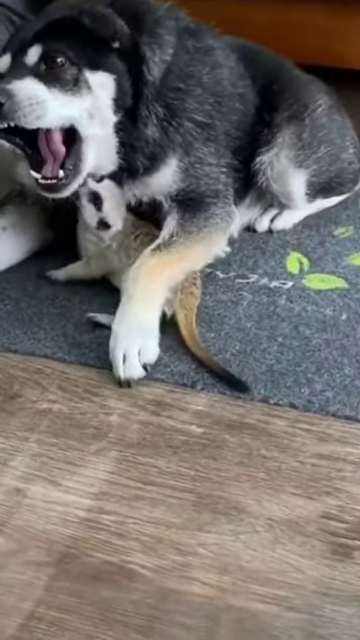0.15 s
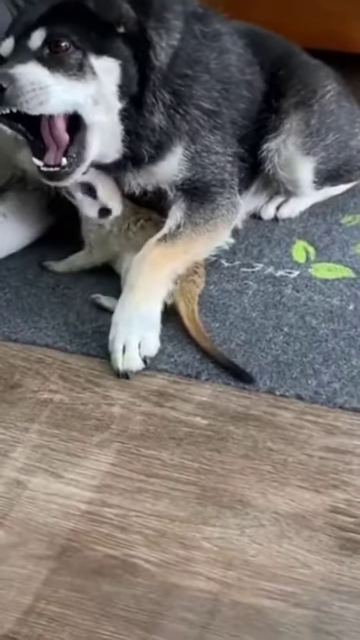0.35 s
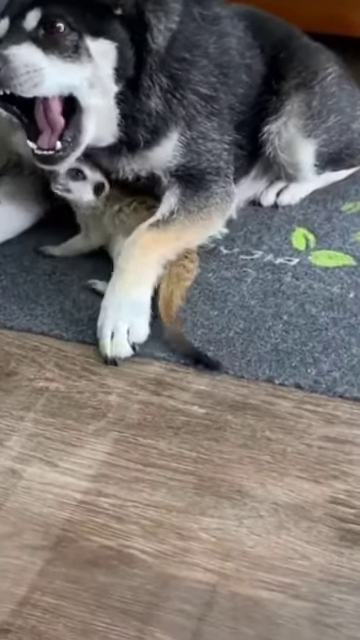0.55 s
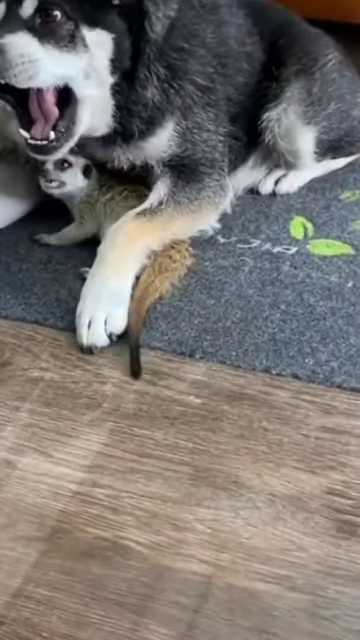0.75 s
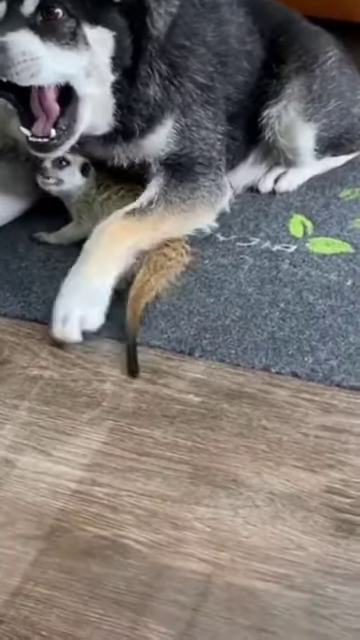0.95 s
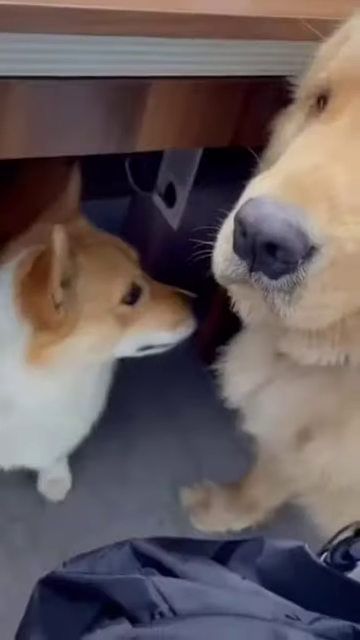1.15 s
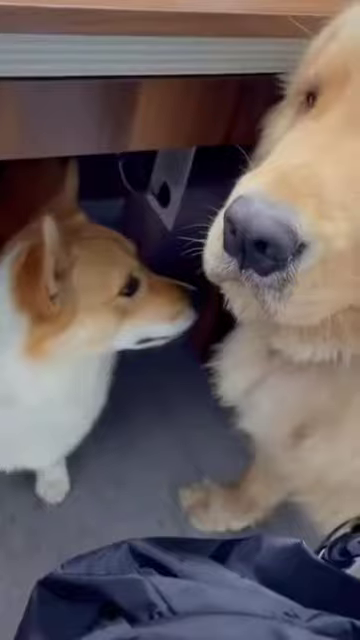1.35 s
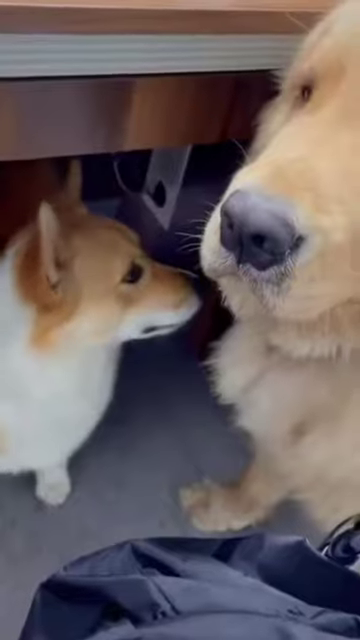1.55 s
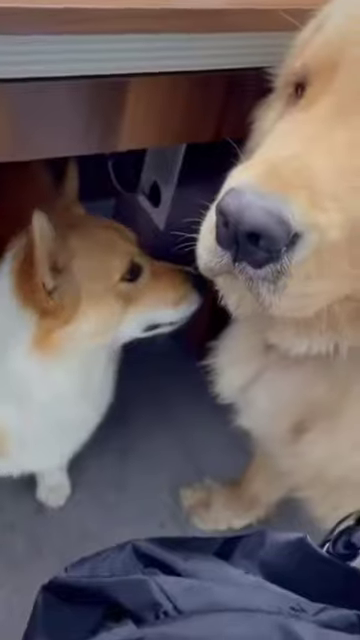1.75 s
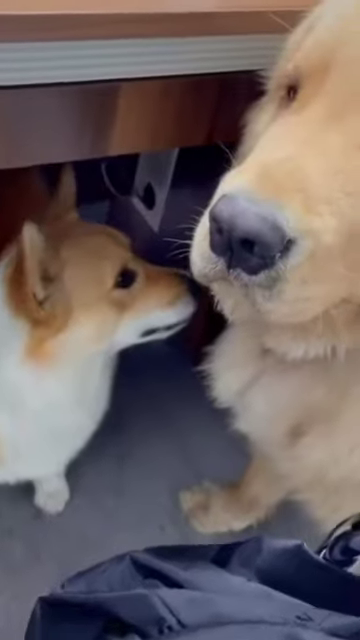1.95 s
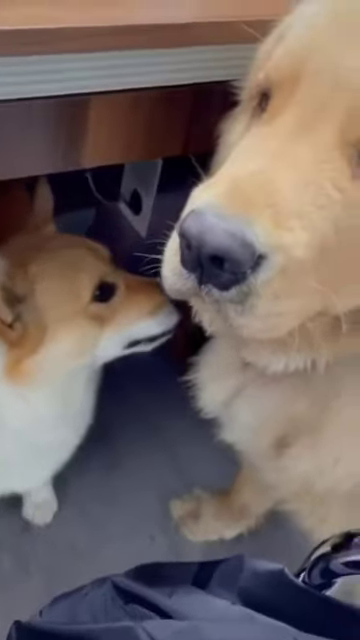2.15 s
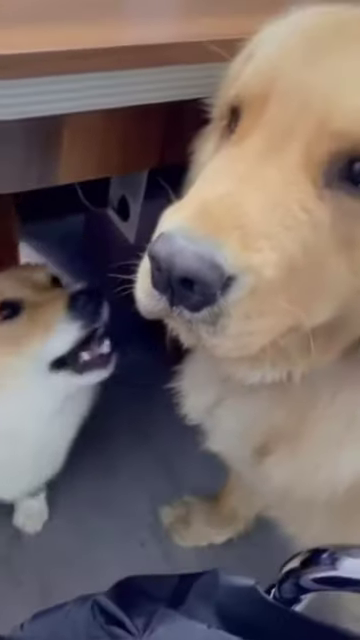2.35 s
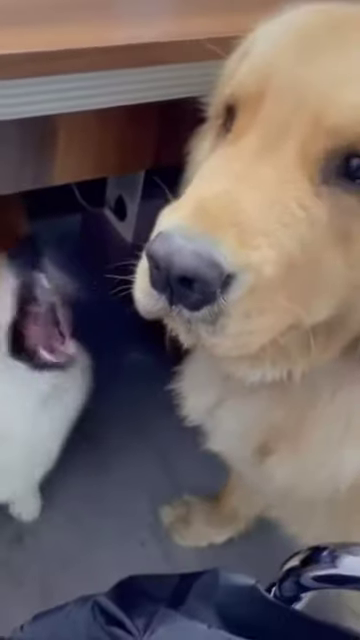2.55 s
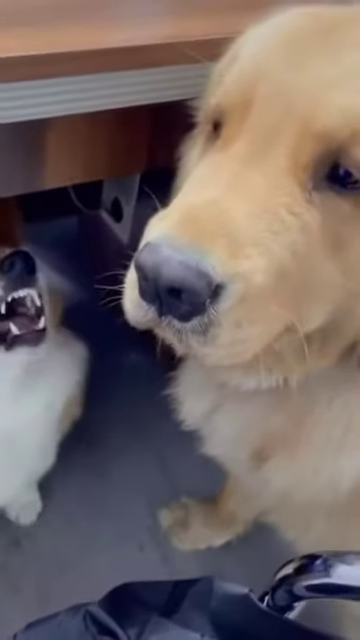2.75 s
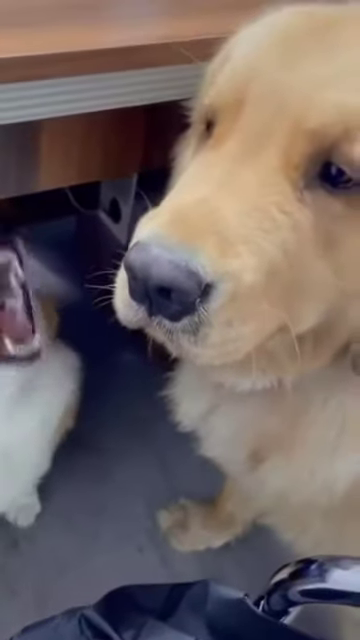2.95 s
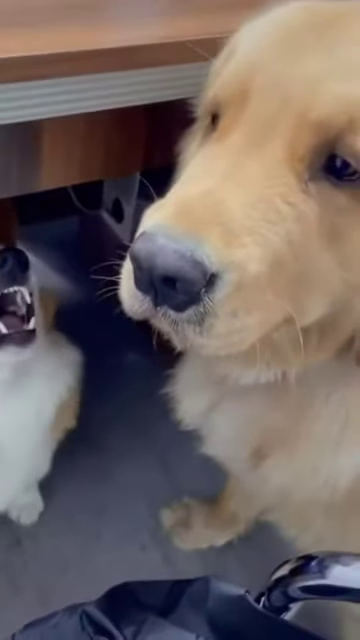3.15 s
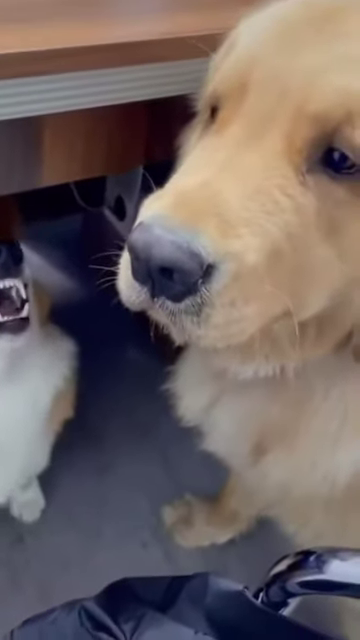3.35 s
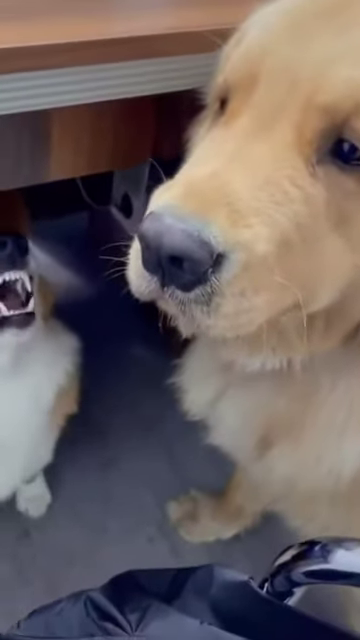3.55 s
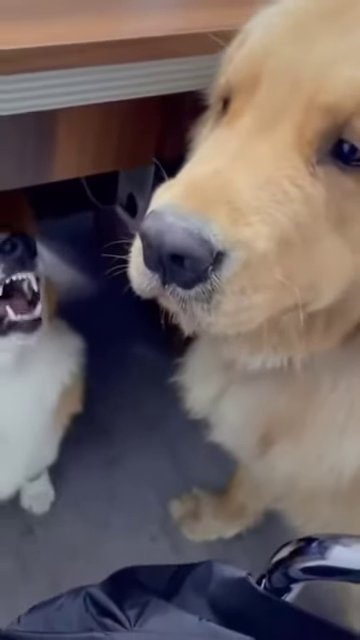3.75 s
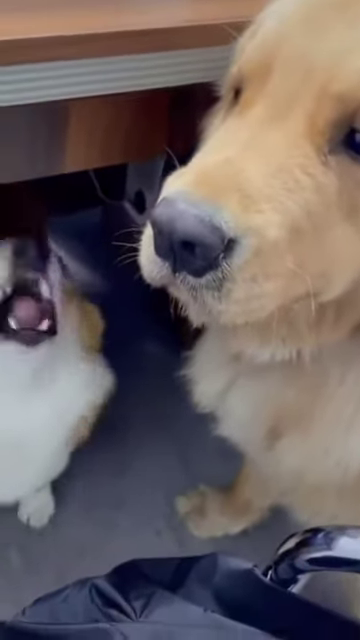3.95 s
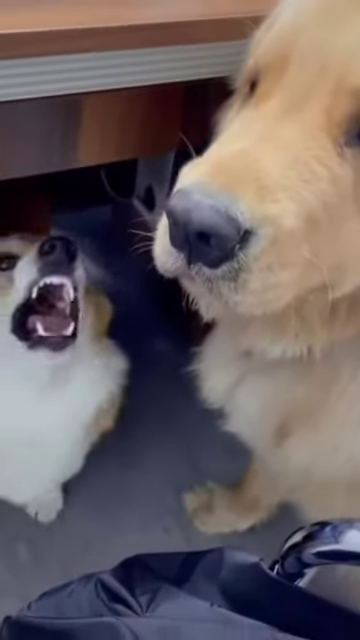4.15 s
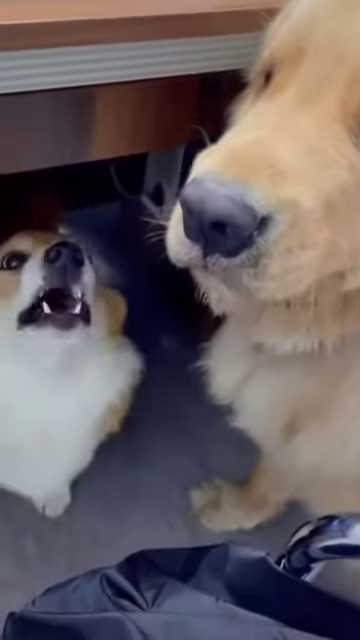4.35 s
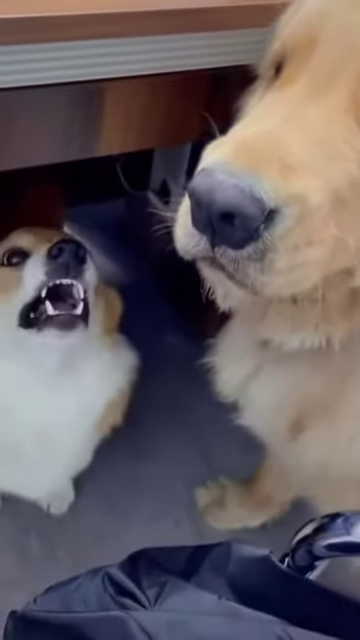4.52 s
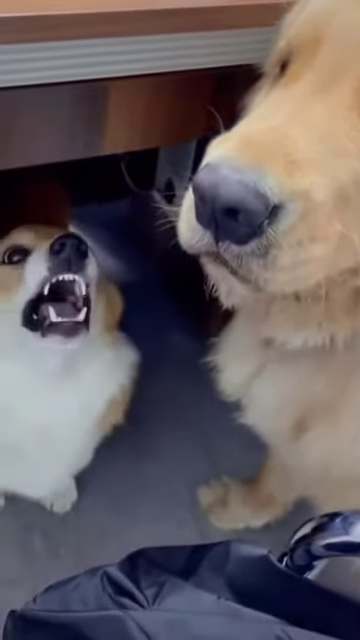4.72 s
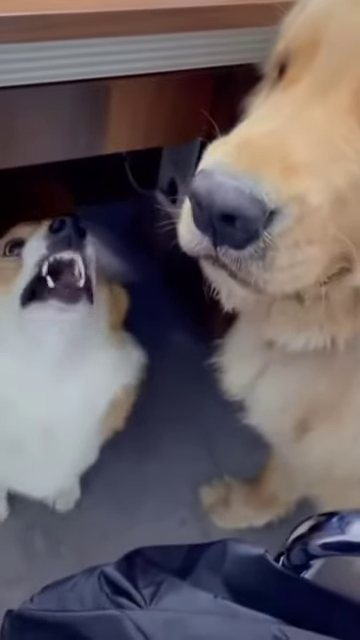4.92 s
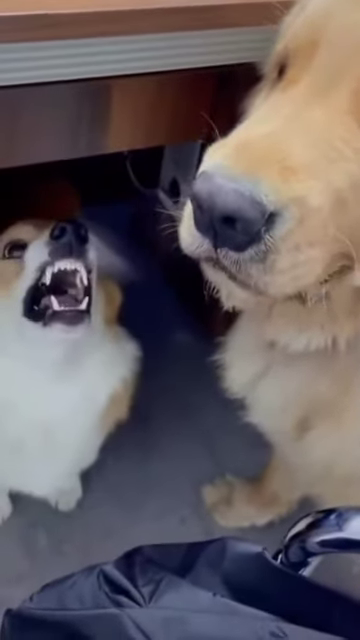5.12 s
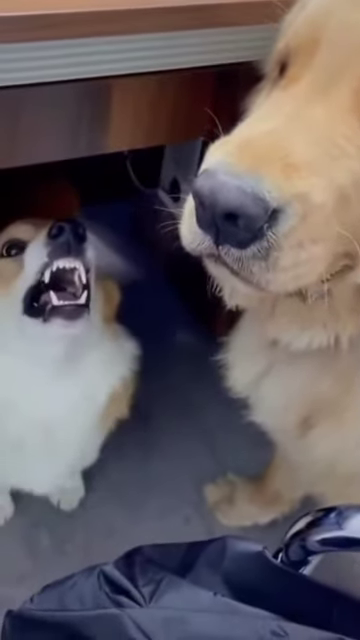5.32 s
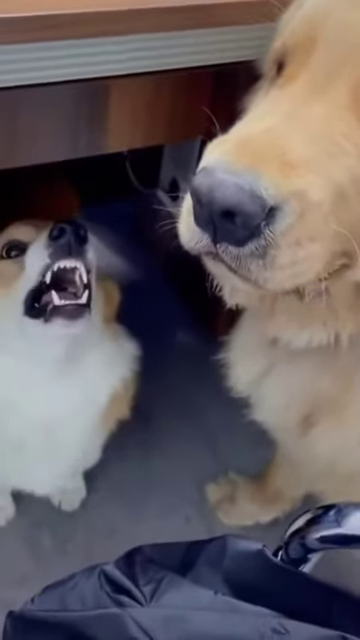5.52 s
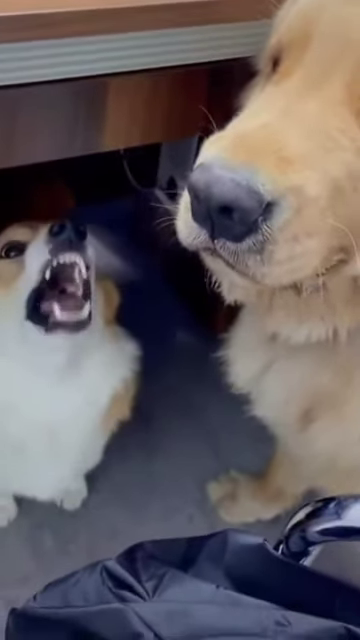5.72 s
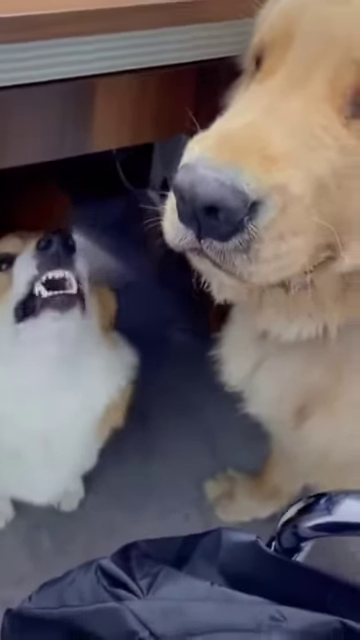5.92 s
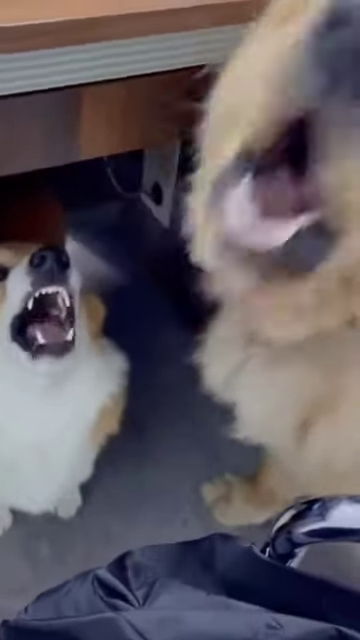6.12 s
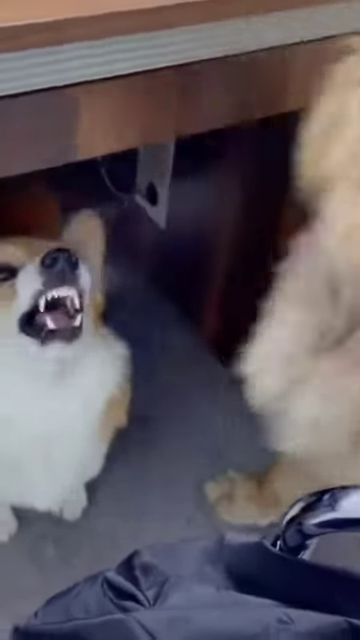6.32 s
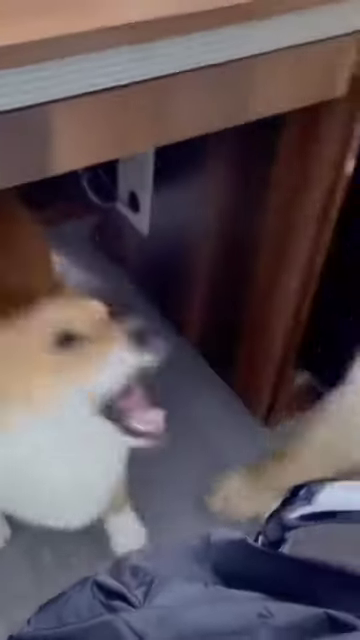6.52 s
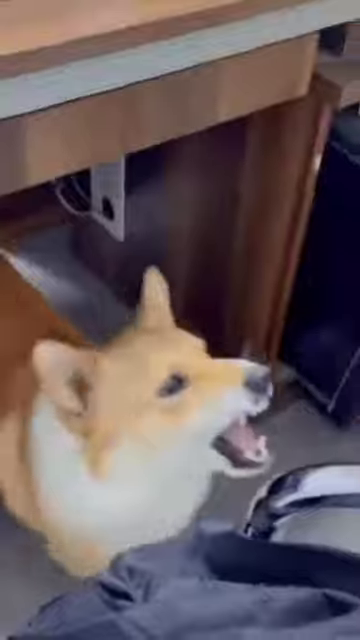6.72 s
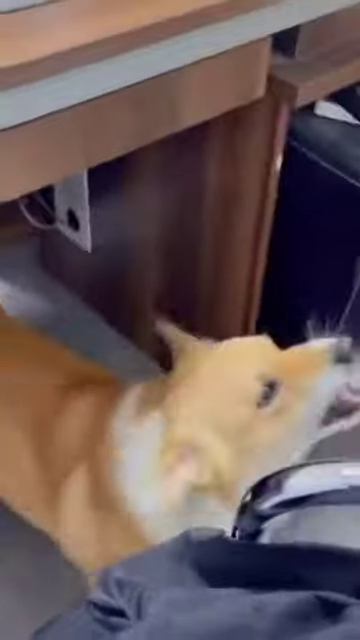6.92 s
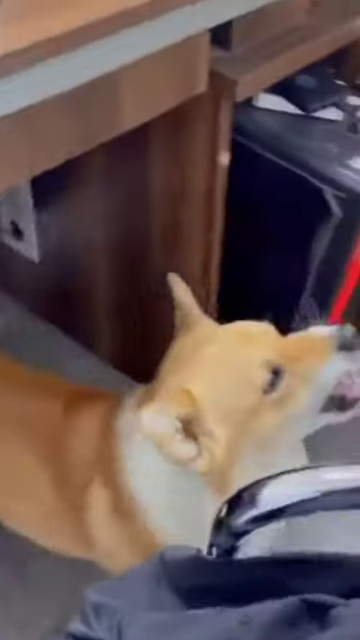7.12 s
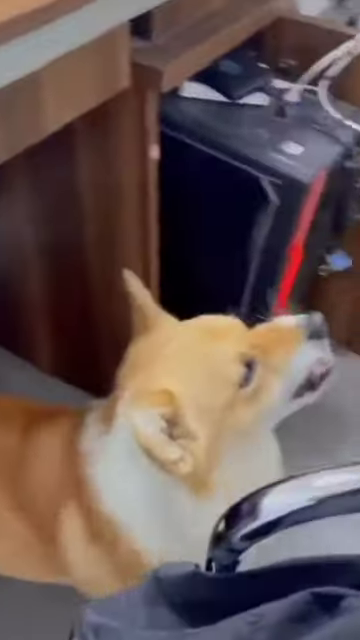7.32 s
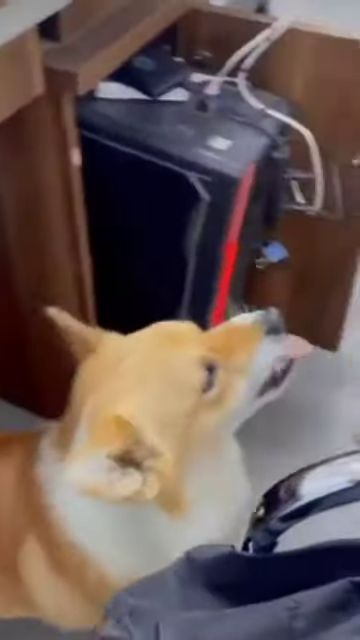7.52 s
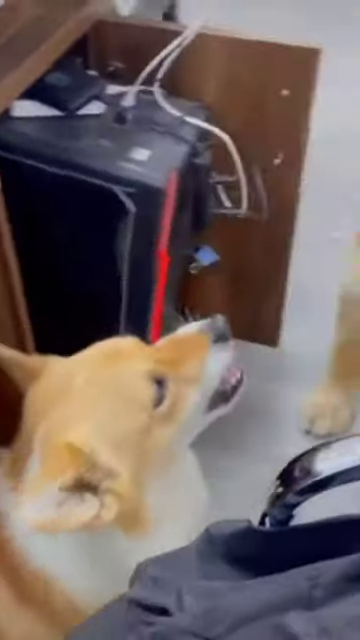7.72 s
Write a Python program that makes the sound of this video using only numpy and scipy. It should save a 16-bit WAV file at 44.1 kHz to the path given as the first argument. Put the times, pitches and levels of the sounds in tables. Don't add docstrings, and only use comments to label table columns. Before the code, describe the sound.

From 0 to 1 s, close and wide in stereo, an animal's airy hiss and pant swells several times, strongest near 0.6 and 0.9 s, with small grunts, squeaks and low bumps. A faint tick marks the cut at about 1.1 s. From 1.25 s, in mono, a small dog growls softly and low until 2.2 s. Sharp, arching barks snap out at 2.3, 2.6 and 3.0 s, with a bump of handling near 2.9. A quiet sinking growl follows, then barks at 3.9, 4.3 and 4.9 s, with a tightening growl and snarl between. After a pause with a fluttering gasp, a long hoarse bark at 5.8 s. From 6.1 s another dog's whistling, wavering yelps rise over duller barks at 6.6 and 6.9 s, dying into a whimper and faint mutter by 7.7 s. Short room echo, soft air and hand rumble.

```python
import sys
import numpy as np
from scipy import signal
from scipy.fft import rfft, irfft, next_fast_len
from scipy.io import wavfile
from scipy.ndimage import uniform_filter1d, minimum_filter1d, map_coordinates

SR = 44100
rng = np.random.default_rng(int(sys.argv[2]) if len(sys.argv) > 2 else 0)


def nominal_scale(level):
    x = np.asarray(level, float) / 20
    return 10 ** x


def generate_wav(signal):
    frames = np.transpose(np.atleast_2d(signal))
    scaled = np.clip(frames, -1, 1) * 32767
    pcm = np.round(scaled).astype(np.int16)
    wavfile.write(sys.argv[1], SR, pcm)


N = 342657
SECOND_S = 1.25
LOCK_HZ = 538


def unit(x):
    return x / np.sqrt(np.mean(x ** 2) + 1e-20)


def even(x, over_s):
    power = uniform_filter1d(x ** 2, round(over_s * SR), mode="reflect")
    return x / np.sqrt(np.abs(power) + 1e-12)


def along(points, hz):
    f, v = np.transpose(points)
    return np.interp(np.log(hz + 1), np.log(f + 1), v, -120, -120)


def span(rows):
    return round((rows[-1][0] - rows[0][0]) * SR)


def curves(rows, length):
    s, *cols = np.transpose(rows)
    return [np.interp(s[0] + np.arange(length) / SR, s, c) for c in cols]


def wobble(rate, length):
    knots = rng.standard_normal(int(length * rate / SR) + 4)
    return map_coordinates(knots, [np.arange(length) * rate / SR])


def bumps(rows, n):
    t = np.arange(n) / SR
    return sum(nominal_scale(db - 10 * np.where(t < s, (s - t) / rise, (t - s) / fall)) for s, db, rise, fall in rows)


def filtered(x, response):
    m = next_fast_len(x.shape[-1] + 4096)
    return irfft(rfft(x, m) * response(np.fft.rfftfreq(m, 1 / SR)), m)[..., :x.shape[-1]]


def noise(spectrum, shape):
    return unit(filtered(rng.standard_normal(shape), lambda hz: nominal_scale(along(spectrum, hz))))


def tract(modes):
    def response(f):
        return sum((-1) ** k * nominal_scale(db) * 1j * f * w / (c * c - f * f + 1j * f * w)
                   for k, (c, w, db) in enumerate(modes))
    return response


def add(track, s, x):
    at, ends = round(s * SR), np.arange(len(x))
    x = x * np.clip(np.minimum(ends, ends[::-1]) / 130, 0, 1)
    track[at:at + len(x)] += x[:N - at]


def folds(pitch, rough, jitter, tilt, flutter_db, first, count, second_db=0):
    rough, n = np.clip(rough, 0, 1), len(pitch)
    pitch = uniform_filter1d(pitch, round(.02 * SR), mode="nearest")
    shaky = pitch * (1 + jitter * rough * wobble(pitch.mean() / 2, n))
    phase = 2 * np.pi * np.cumsum(shaky) / SR
    pulses = np.zeros(n)
    for k in range(round(first), count + 1):
        level = second_db * (k == 2) + flutter_db * wobble(pitch.mean() / 9, n)
        pulses += k ** -tilt * nominal_scale(level) * np.cos(k * phase + .35 * k * k)
    pulses = unit(pulses)
    pulses *= 1 + np.clip(3.8 * rough * wobble(30, n), -1, 1) * np.cos(phase / 2)
    air = unit((1 + np.cos(phase)) ** 2 * rng.standard_normal(n))
    return np.sqrt(1 - rough) * pulses + 2.4 * rough * air, phase


# (f/Hz, width/Hz, level/dB)
GAPE = [(616, 1100, -8.5), (1157, 560, 0.5), (1718, 820, -0.5), (2740, 210, -5.5), (3126, 230, -8)]
THROAT = [(640, 240, -3.5), (867.6, 210, -0.5), (1394, 200, -6), (1620, 170, -1), (2135, 140, -13),
          (2583, 120, -10.5)]
# (f/Hz, level/dB per Hz)
TEETH = [(1900, -41.5), (3300, -8), (4000, -13), (4400, -24), (5300, -15.5), (6400, -6), (7200, -15.5),
         (7900, -40.5), (8900, -18), (10400, -30), (12200, -23), (13400, -48.5), (15000, -50.5),
         (15350, -29), (15700, -60.5)]


def bark(start, pitch, db, top_db, rough, first_db, second_db, clear_hz, thin_db):
    def edges(f):
        return (1j * f / 500) ** 2 / (1 + 1j * f / 500) ** 2 / (1 + (f / clear_hz) ** 10)

    gape = np.clip(1 - 4 * (1 - pitch / pitch.max()), 0, 1)
    source, phase = folds(pitch, rough + .18 * (1 - gape), jitter=.05, tilt=0.22, flutter_db=3.0,
                          first=2, count=12, second_db=second_db * gape)
    voice = gape * filtered(source, tract(GAPE)) + 2.0 * (1 - gape) * filtered(source, tract(THROAT))
    ridges = unit(filtered(source, lambda f: nominal_scale(along(TEETH, f)) * (f < 7400) * (f > 4200)))
    air = filtered(noise(TEETH, len(db)), lambda f: nominal_scale(thin_db * (f > 8000)))
    air = (0.35 + 0.9 * rough) * air * (1 + 0.77 * np.cos(phase))
    teeth = nominal_scale(2.5 * wobble(60, len(db))) * (air + 0.8 * ridges)
    if start > 6.4:
        voice = filtered(voice, lambda f: 1 / (1 + (f / 2500) ** 4))
    overtones = nominal_scale(db - 2.0) * (even(filtered(voice, edges), over_s=0.025) + nominal_scale(top_db + 4.0) * teeth)
    return overtones + nominal_scale(first_db) * np.sqrt(2) * np.sin(phase)


# (t/s, length/s, top pitch f/Hz, level/dB, fundamental level/dB)
CLEAR = [(2.575, .155, 636, -8.5, -21.5)]
BRIGHT = [(4.863, 0.156, 636, -7.5, -26)]
HOARSE = [(2.99, 0.158, 612, -8.5, -26.5)]
SHARP = [(3.93, .145, 640, -8.5, -23.5)]
ROUGH = [(2.262, .158, 630.2, -15, -16.5)]
SLOW = [(4.268, .19, 632, -8.5, -24.5)]
LATE = [(5.765, .2, 638, -9, -22.5)]
TURNED = [(6.55, .19, 614.5, -16.5, -27)]
LAST = [(6.858, .165, 565, -15.5, -29)]
# (barks, roughness [0-1], pitch drop at the ends [0-1], place of the top [0-1],
# attack share [0-1], sag level/dB, start level/dB, flatness of the top [exponent],
# second partial level/dB, highest clear f/Hz, thin hiss level/dB)
KINDS = [
    (CLEAR, 0.07, 0.62, .5, 0.2041, -7, -28, 2.4, 0.1, 3450, -3),
    (BRIGHT, .12, .6, .55, .26, -7, -30, 2.2, -1.5, 3350, 8),
    (HOARSE, .17, .54, .49, .24, -7, -34, 2.1, -4, 3350, 5),
    (SHARP, .25, .54, .54, .2, -5, -20, 2.2, -1.5, 3450, 1.5),
    (ROUGH, .45, .55, .52, .2, -1.2, -30, 2.2, -3, 3050, -1.5),
    (SLOW, .33, .62, .54, 0.28, -7, -38, 2.1, -1.5, 3150, .1),
    (LATE, .31, .62, .6, .36, -6, -37, 2.3, -.5, 2900, -.5),
    (TURNED, .36, .35, .4, 0.1176, -4, -22, 2.1, -.1, 3300, 1.5),
    (LAST, .28, .35, .45, .1, -4, -20, 2.1, -.1, 3300, -3),
]
# (f/Hz, level/dB per Hz)
SPIT = [(2600, -30), (3300, -8), (3950, 0), (4400, -11), (5000, -8), (7500, -22), (10000, -19),
        (15700, -30)]
# (centre t/s, level/dB, half width/s)
PUFFS = [(3.035, -33, .015), (5.787, -43, .005), (5.82, -34, .012), (5.843, -28, .011), (6.16, -38, .014),
         (6.575, -37, .012), (6.94, -38, .03), (7.65, -78, .004)]
# (t/s, pitch f/Hz, level/dB)
TRAIL = [(7.01, 420, -52), (7.032, 370, -43), (7.056, 300, -47), (7.085, 232, -57), (7.17, 222, -57),
         (7.2, 200, -61), (7.28, 190, -69)]


def barks():
    out = np.zeros(N)
    hold, crest = 0.7352, 0.5156
    teeth_db, teeth_end_db = -26.5, -8.5
    for rows, rough, drop, top, attack, sag_db, start_db, flat, *mouth in KINDS:
        for s, length, hz, db, first_db in rows:
            u = np.linspace(0, 1, round(length * SR))
            from_top = np.where(u < top, 1 - u / top, (u - top) / (1 - top))
            pitch = hz * (1 - drop * from_top ** flat)
            pitch -= (u < top) * .65 * (pitch - LOCK_HZ) * np.exp(-((pitch - LOCK_HZ) / 35) ** 2)

            level = db + np.interp(u, [0, attack, hold, 1], [start_db, 0, sag_db, sag_db - 20])
            after_s = (u - attack) * length
            level += -4 * np.exp(-((after_s - .012) / .018) ** 2)
            first = first_db + np.interp(u, [0, attack, crest, crest + 0.23, 1], [-26, -8, 0, -4, -23])

            effort_db = 0.53 * (db + 9)
            air = teeth_db + effort_db + np.interp(u, [0, attack, hold, 1], [-4, 0, 3, teeth_end_db])
            snap = np.exp(-(after_s / 0.0073) ** 2)
            spit = nominal_scale(db - 26 + effort_db) * snap * noise(SPIT, len(u))
            add(out, s, spit + bark(s, pitch, level, air + 3 * snap, rough, first, *mouth))
    for s, db, wide in PUFFS:
        u = np.linspace(-2, 2, round(4 * wide * SR))
        add(out, s - 2 * wide, nominal_scale(db) * np.exp(-u ** 2) * noise(SPIT, len(u)))
    pitch, db = curves(TRAIL, span(TRAIL))
    moan = bark(TRAIL[0][0], pitch, db, teeth_db + teeth_end_db, 0.448, db + 8,
                second_db=-.1, clear_hz=3050, thin_db=-3)
    add(out, TRAIL[0][0], moan)
    return out


# (centre t/s, f/Hz, peak level/dB, length/s)
FLARES = [(2.319, 859.7, -11.5, .03), (2.594, 850, -13, 0.017), (2.612, 1620, -3, .013),
          (3.032, 882, -11, .04), (3.043, 1620, -8, .02), (3.961, 1647, -4.5, .014),
          (4.314, 868.8, -9.5, 0.03), (4.326, 1574, -4.5, .016), (4.905, 1625, -6.5, 0.012),
          (5.839, 1643, -9, .018), (6.595, 894.6, -12.5, .045), (6.92, 850, -11, .03)]
# (centre t/s, f/Hz, peak level/dB,
# length/s)
RINGS = [(6.335, 905, -24, .04), (6.35, 1355, -28, .04), (6.35, 2260, -32, .04), (5.015, 700, -27, .03),
         (2.112, 1980, -70, .02), (2.14, 2450, -66, .025), (2.168, 1900, -72, .02), (2.275, 640, -24, .012),
         (3.012, 1030, -21, .012), (3.058, 890, -17, .015), (4.893, 930, -14, .01),
         (4.908, 1105, -10, .018), (4.87, 980, -27, .012), (5.812, 1950, -20, .02), (3.03, 920, -13, .02),
         (6.94, 1120, -17, .03), (6.873, 1000, -18, .015), (2.296, 2050, -15, .015),
         (2.305, 1700, -16, .015), (2.33, 1620, -15, .02), (2.35, 1900, -18, .025), (2.368, 1390, -11, .03),
         (2.69, 1560, -18, .015), (2.71, 700, -27, .015), (3.11, 1560, -16, .02), (3.134, 700, -24, .015),
         (3.983, 1540, -12, .012), (4.02, 1500, -12, .02), (4.345, 1560, -12, .02), (4.39, 2120, -20, .02),
         (4.986, 1560, -15, .015), (4.995, 720, -24, .025), (5.825, 880, -15, .025),
         (5.862, 1550, -12, .02), (5.9, 1500, -14, .025), (5.93, 690, -21, .02), (6.572, 950, -17, .025),
         (6.42, 1010, -25, .04), (6.2, 850, -25, .03), (6.425, 860, -24, .05), (6.945, 1650, -17.5, .045),
         (6.63, 2450, -28, .04)]
# (multiple of the pitch, level/dB re third)
LOCKED = [(2, -10), (4, -13), (5, -12), (7, -22)]


def flares():
    out = np.zeros(N)
    for rows, rise in [(FLARES, 0.028), (RINGS, -0.005)]:
        for s, hz, db, length in rows:
            u = np.linspace(-1, 1, round(2 * length * SR))
            glide = hz * (1 + rise * u + 0.013 * wobble(150, len(u)))
            phase = 2 * np.pi * np.cumsum(glide) / SR
            tone = np.sin(phase)
            if rise > 0 and hz > 2 * LOCK_HZ:
                tone = tone + sum(nominal_scale(level) * np.sin(round(k) * phase / 3) for k, level in LOCKED)
            add(out, s - length, nominal_scale(db) * np.exp(-4.5 * u ** 2) * tone)
    return out


# (t/s, pitch f/Hz, level/dB, second partial level/dB, upper partials level/dB)
YELP = [
    [(6.05, 135, -48, -5.5, -10), (6.092, 267.3, -45, -12, -14), (6.134, 375, -16, -12, -10),
     (6.166, 462, -10.5, -5.5, -12), (6.187, 530, -5, -26, -24), (6.221, 537, -9, -19, -26),
     (6.232, 556, -21, -7, -6), (6.264, 566, -31, -4, -8), (6.31, 455, -31, 3, -13)],
    [(6.358, 454, -23, 0, -8), (6.38, 482, -17, -14, -26), (6.412, 543, -12.5, -18, -16),
     (6.444, 544, -11, -24, -28), (6.47, 522, -20, -3, -14), (6.505, 450, -36, -6, -20),
     (6.535, 403, -35, 2, -16)],
    [(6.598, 404, -29, 3, -4), (6.632, 461, -16, -10, -20), (6.676, 530, -15, -13, -17),
     (6.7, 544, -24, -6, -8), (6.736, 505, -18, -15, -24), (6.78, 450, -33, -2, -12),
     (6.83, 440, -38, 2, -6)],
    [(6.852, 460, -29, -6, -6), (6.878, 488, -16, -8, -17), (6.93, 555, -22, -8, -8),
     (6.985, 497, -16, -11, -15), (7.002, 480, -27, -8, -12), (7.02, 548, -23, -14, -16),
     (7.045, 515, -34, -6, -14), (7.074, 500, -30, -10, -16), (7.105, 481, -47, 4, -12)],
]
# (t/s, pitch f/Hz, level/dB, second level/dB, upper level/dB)
WHIMPER = [(7.126, 478, -39, -2, -22), (7.148, 528, -33, -5, -25), (7.168, 515, -35, -6, -25),
           (7.185, 487, -44, 1, -25), (7.202, 496, -36, -8.5, -25), (7.26, 497, -41, -9, -30),
           (7.29, 500, -50, -20, -30), (7.46, 499.3, -74.5, -24.5, -30)]
# (f/Hz, level/dB per Hz)
RASP = [(350, -55), (700, -19), (915, -5.5), (1170, -19), (1760, -11.5), (2300, -28), (2550, -42),
        (3200, -28), (6900, -34.5), (7400, -60), (8400, -56), (8700, -42.5), (13000, -54), (15600, -66)]


def yelp():
    rows = sum(YELP, []) + WHIMPER
    n = span(rows)
    pitch, db, second_db, upper_db = curves(rows, n)
    rasp_db = -6 + 0.403 * upper_db
    wavering = uniform_filter1d(pitch, 600, mode="nearest") * (1 + 0.0068 * wobble(90, n))
    phase = 2 * np.pi * np.cumsum(wavering) / SR
    overtones = sum(nominal_scale(-3.5 * (k - 3) + 2.5 * wobble(40, n)) * np.sin(k * phase) for k in range(3, 8))
    overtones = filtered(overtones, lambda f: 0.04 + 0.96 / (1 + (f / 2250) ** 16))
    rasp = noise(RASP, n) * (1 + 0.33 * np.cos(phase)) * nominal_scale(2.5 * wobble(35, n))
    cry = nominal_scale(1.2 * wobble(45, n)) * np.sin(phase)
    cry += nominal_scale(second_db + wobble(40, n)) * np.sin(2 * phase + 1)
    cry += nominal_scale(upper_db) * overtones
    out = np.zeros(N)
    add(out, rows[0][0], nominal_scale(db) * (np.sqrt(2) * cry + nominal_scale(rasp_db) * rasp))
    return out


# (t/s, pulse rate f/Hz, level/dB)
GROWL_CALM = [(1.25, 76.6, -56), (1.278, 76.1, -52), (1.484, 79.3, -52.5), (1.742, 99.2, -48.5),
              (1.81, 109, -50), (1.848, 103, -48), (1.894, 108, -51), (2.09, 95, -48), (2.2, 98, -60)]
GROWL_TENSE = [
    [(3.2, 125.5, -52), (3.322, 118, -54.5), (3.49, 109.9, -54.5), (3.88, 107.9, -55.5), (3.93, 107.9, -48)],
    [(4.1, 100.9, -53.5), (4.176, 126.4, -47), (4.28, 124.6, -42.5)],
]
SNARL = [(4.46, 121, -44), (4.632, 130.3, -39), (4.68, 111.6, -42), (4.84, 110.5, -43.5),
         (4.88, 110.5, -34)]
MUTTER = [(7.1, 150, -60), (7.22, 131.4, -56.5), (7.35, 128, -64.5), (7.664, 122.2, -61.5),
          (7.77, 112.2, -65.5)]
# (t/s, pulse rate f/Hz, level/dB)
SIGHS = [
    [(2.4, 200, -56), (2.46, 145, -61), (2.55, 130, -68)],
    [(5.0, 260, -50), (5.1, 175, -56), (5.22, 130, -66)],
]
# (f/Hz, width/Hz, level/dB)
CHEST = [(85, 80, 1), (204, 60, 1), (385, 61, -1), (614, 84, -14.5)]
BARED = [(129, 25, -7), (370, 110, -2), (509.2, 37, 0), (775, 220, -6.5), (1200, 400, -29)]
NOSE = [(126, 47, 3), (260, 88, -18), (507, 210, -24), (850, 270, -7)]
WHEEZE = [(1050, 500, -5), (1750, 300, -8), (2305, 100, 1.5), (3880, 380, -5.5), (5200, 580, -11.5)]
# (t/s, half width/s, added roughness [0-1])
BREAKS = [
    (1.79, .03, .3),
    (1.895, .014, .25),
]
# (t/s, length/s, level/dB, flutter f/Hz, depth [0-1])
GASPS = [(2.1, 0.08, -73, 98, .3), (3.46, .08, -66, 110, .6), (3.577, .035, -69, 110, .4),
         (3.895, 0.016, -62, 108, .3), (4.728, 0.06, -45, 112, .8), (4.794, .07, -48, 118, .8),
         (5.743, 0.05, -49, 115, .95)]
# (f/Hz, level/dB per Hz)
GASP = [(300, -24), (710, 0), (1550, -15), (2000, 5), (2600, -17), (3900, -8), (4700, -30), (5800, -38),
        (6800, -15), (7800, -45)]


def growls():
    out = np.zeros(N)
    calm, tense, snarl, mutter = .015, .13, .25, .18
    voices = [(GROWL_CALM, CHEST, calm), (GROWL_TENSE[0], CHEST, tense), (GROWL_TENSE[1], BARED, tense),
              (SIGHS[0], CHEST, snarl), (SIGHS[1], CHEST, snarl), (SNARL, BARED, snarl),
              (MUTTER, NOSE, mutter)]
    for rows, modes, rough in voices:
        n = span(rows)
        pitch, db = curves(rows, n)
        t = rows[0][0] + np.arange(n) / SR
        rough = rough + sum(more * np.exp(-((t - s) / wide) ** 2) for s, wide, more in BREAKS)
        source, phase = folds(pitch, rough, jitter=0.17, tilt=0.064, flutter_db=.6 + 11 * rough,
                              first=1, count=14)
        voice = filtered(source, lambda f: tract(modes)(f) * (0.15 + 1 / (1 + (f / 690) ** 12)))
        wheeze = (1 + np.cos(phase)) ** 2 * nominal_scale(1.5 * wobble(28, n)) * rng.standard_normal(n)
        wheeze = unit(filtered(wheeze, tract(WHEEZE)))
        wheeze_db = -27 + 1.7 * np.clip(db - db.mean(), -3, 2.5)
        add(out, rows[0][0], nominal_scale(db) * (even(voice, over_s=.09) + nominal_scale(wheeze_db) * wheeze))
    for s, length, db, hz, depth in GASPS:
        n = round(length * SR)
        cycle = np.cumsum(hz * (1 + .12 * wobble(40, n))) / SR
        flap = 1 - np.clip(depth, 0, 1) * (1 - 2.2 * np.sin(np.pi * cycle) ** 4)
        add(out, s, nominal_scale(db + 2.5 * wobble(32, n)) * flap * noise(GASP, n))
    return out


def patchy(x, depth_db):
    z = signal.stft(x, nperseg=512)[2]
    field = uniform_filter1d(rng.standard_normal(z.shape[1:]), size=3, axis=0)
    field = uniform_filter1d(field, size=7, axis=1)
    return signal.istft(z * nominal_scale(depth_db * unit(field) - 1), nperseg=512)[1][:, :x.shape[1]]


# (t/s, level/dB)
HISS = [(0.0, -52), (0.03, -38), (0.07, -34.5), (0.2, -57), (0.28, -58), (0.33, -46), (0.45, -39.5),
        (0.588, -26.5), (0.67, -29.5), (0.74, -35.5), (0.902, -27.5), (1.02, -27.5)]
# (f/Hz, level/dB per Hz)
HISS_AIR = [(530, -33.5), (900, -2.5), (1420, -2), (1520, -3), (2630, -0.5), (3030, -3), (3890, -0.5),
            (5910, -1.5), (7500, -18.5), (13900, -32.5), (15500, -54)]
HISS_LOW = [(76, -33), (130, -6), (474, -5), (719, 2), (826, -11.5), (1400, -15), (1820, -40.5),
            (3080, -120)]
# (t/s, level/dB, f/Hz, length/s)
GRUNTS = [
    (0.026, -27.5, 190, 0.045),
    (0.645, -22, 714, 0.06),
    (0.908, -24, 730, .04),
]
# (t/s, rumble level/dB, chest level/dB, width/s)
THUMPS = [
    (0.038, -30, -25, 0.0262),
    (.6, -41, -33.5, 0.0482),
    (0.926, -39, -25.5, 0.028),
    (1.01, -38, -45, .025),
]
# (f/Hz, level/dB per Hz)
GRIP = [(12, -32.5), (20, -7), (48, -3), (97, -4.5), (134, -9.5), (330, -18), (430, -52.5), (730, -120)]


def hiss():
    n = span(HISS)
    air_db, = curves(HISS, n)
    rumble = nominal_scale(-50.5) + bumps([(s, db, w, w) for s, db, _, w in THUMPS], n)
    mean_db = air_db.mean()
    low = nominal_scale(mean_db - 9.5 + 0.79 * (air_db - mean_db))
    low = low + bumps([(s, db, w, w) for s, _, db, w in THUMPS], n)
    breath = 0.7 * noise(HISS_AIR, (2, n)) + 0.6 * noise(HISS_AIR, n)
    effort = nominal_scale(air_db + 2 + 0.87 * wobble(40, n) + 1.2 * wobble(12, n))
    pair = effort * patchy(breath, depth_db=3) + low * noise(HISS_LOW, (2, n))
    pair += rumble * (noise(GRIP, n) * nominal_scale([[1.0], [-1.0]]) + 0.3 * noise(GRIP, (2, n)))
    pair += nominal_scale(-67) * noise([(300, 0), (6000, -6), (14000, -5), (15000, -40)], (2, n))
    out = np.pad(pair, ((0, 0), (0, N - n)))
    for s, db, hz, length in GRUNTS:
        m = round(length * SR)
        for side in out:
            phase = 2 * np.pi * np.cumsum(hz * (1 + 0.051 * wobble(70.2, m))) / SR
            add(side, s, nominal_scale(db) * np.hanning(m) * np.sin(phase))
    fade, tick = np.arange(2600) / SR, round(1.074 * SR)
    out[:, n:n + 2600] += nominal_scale(-40.5 - 60 * fade / 0.0823) * noise(HISS_AIR, (2, 2600))
    out[:, tick:tick + 2600] += nominal_scale(-44 - 60 * fade / 0.018) * rng.standard_normal((2, 2600))
    return out


# (delay t/s, level/dB)
DESK = [(.0031, -17.5), (.0058, -19), (.0087, -17), (.0126, -16), (.0190, -17.5)]


def panels(x):
    copies = sum((-1) ** k * nominal_scale(db) * np.roll(x, round(s * SR)) for k, (s, db) in enumerate(DESK))
    return 0.9756 * (x + copies)


# (f/Hz, time to fall 60 dB t/s)
ROOM = [(200, 1), (530, 0.59), (760, 0.64), (1400, 0.5155), (3700, 0.56), (9000, 0.38)]


def room(x):
    out, step, size = np.zeros(N + 2 * SR), SR // 8, SR
    room_hz, room_t60 = np.transpose(ROOM)
    for at in range(SR, N, step):
        hz, t, z = signal.stft(rng.standard_normal(size), SR, nperseg=256)
        t60 = np.interp(np.log(hz + 1), np.log(room_hz), room_t60)
        tail = signal.istft(z * nominal_scale(-60 * t / t60[:, None]), SR, nperseg=256)[1][:size]
        part = np.pad(x[at:at + 2 * step], (0, 2 * step))[:2 * step] * np.hanning(2 * step)
        answer = signal.fftconvolve(part, tail / np.linalg.norm(tail))
        out[at + 200:][:2 * step + size - 1] += answer
    return out[:N]


# (t/s, level/dB, rise/s per 10 dB, fall/s per 10 dB)
HANDLING = [(1.44, -68, .05, 0.43), (2.87, -40.5, .06, 0.1858), (3.25, -55.5, .1, 0.28),
            (4.2, -66, .3, 0.5), (4.77, -68, .2, 0.08), (5.1, -66, .08, .06), (5.78, -61, 0.021, 0.17),
            (6.04, -49, 0.043, 0.05), (6.21, -44, 0.027, 0.0047), (6.99, -71.5, .15, 0.5)]
# (f/Hz, level/dB per Hz)
QUIET = [(47, -29.5), (80, -0.5), (220, -10), (1150, -27), (2900, -26), (6700, -35), (15600, -42)]


def floor():
    out, at = np.zeros(N), round(SECOND_S * SR)
    grip = (nominal_scale(-74.5) + bumps(HANDLING, N)[at:]) * nominal_scale(2.5 * wobble(13, N - at))
    add(out, SECOND_S, grip * noise(GRIP, N - at) + nominal_scale(-71) * noise(QUIET, N - at))
    return out


def scene():
    near, far, low = barks() + flares(), yelp(), growls()
    growl_room_db = np.where(np.arange(N) < 2.25 * SR, -17, -5.5)
    to_room = nominal_scale(-14.5) * near + nominal_scale(-15) * far + nominal_scale(growl_room_db) * low
    return hiss() + panels(near) + far + low + room(to_room) + floor()


def limited(x):
    need = np.minimum(1, 1.03 / (np.abs(x).max(axis=0) + 1e-9))
    gain = uniform_filter1d(minimum_filter1d(need, size=260), size=200)
    return np.clip(x * gain, -1, 1)


def starved(hz, t):
    draw = rng.random((len(hz) // 7 + 1, len(t) // 3 + 1))
    cells = np.kron(draw, np.ones((7, 3)))[:len(hz), :len(t)]
    hz = hz[:, None]
    second = (cells < np.where(hz < 5900, .17, .1)) & (hz > 3500) & (t > 2.24)
    first = (cells < .33) & (hz > 9500) & (np.abs(t - .24) > .09) & (t < 1.03)
    return first | second


def low_pass(x):
    return signal.sosfilt(signal.butter(12, 15710, fs=SR, output="sos"), x)


def record(dry):
    hz, t, z = signal.stft(limited(dry), SR, nperseg=2048)
    size = np.abs(z)
    local = np.sqrt(np.abs(uniform_filter1d(size ** 2, size=20, axis=1)))
    masked = local < nominal_scale(-56) * size.max(axis=1, keepdims=True)
    treble = hz[:, None] > np.where(t < SECOND_S, 9300, 3300)
    faint = size < .9 * local + nominal_scale(-122)
    weak = (faint | (masked & (hz[:, None] < 8600))) & treble
    thinned = np.where(starved(hz, t), .03 * z, np.where(weak, 0.19 * z, z))
    mix = signal.istft(thinned, SR, nperseg=2048)[1][:, :N]
    return low_pass(mix)


dry = scene()
out = record(dry)
generate_wav(out)
```